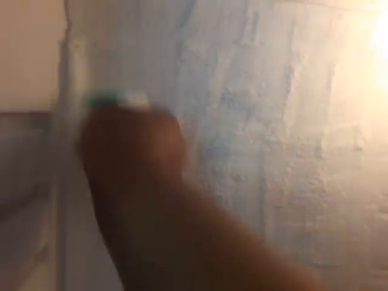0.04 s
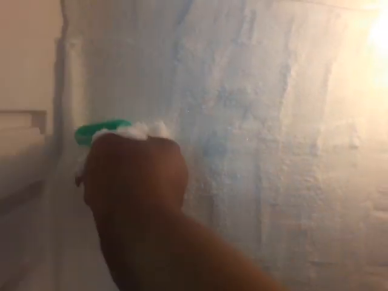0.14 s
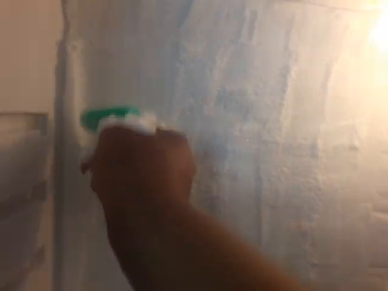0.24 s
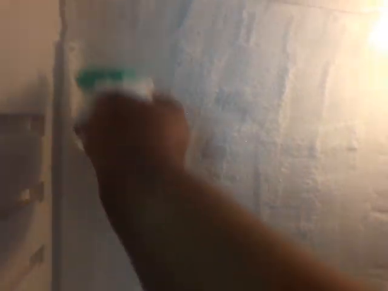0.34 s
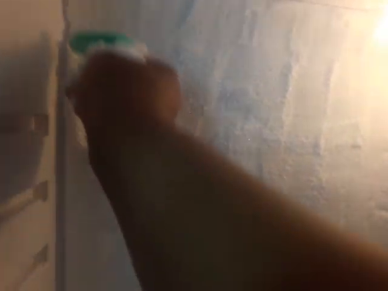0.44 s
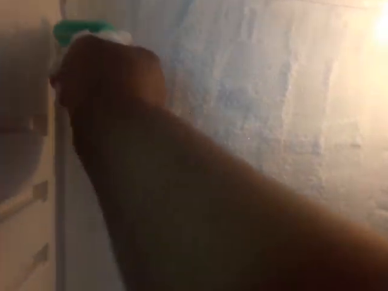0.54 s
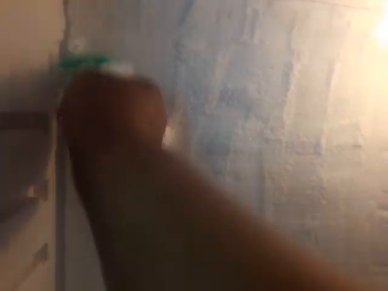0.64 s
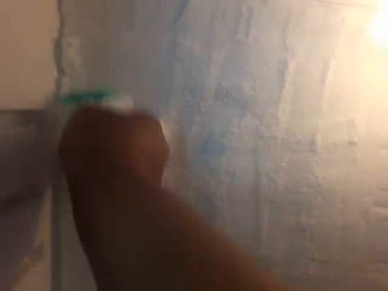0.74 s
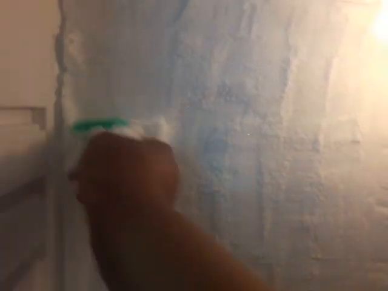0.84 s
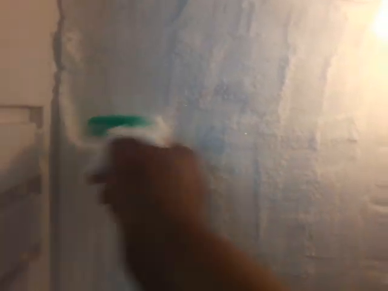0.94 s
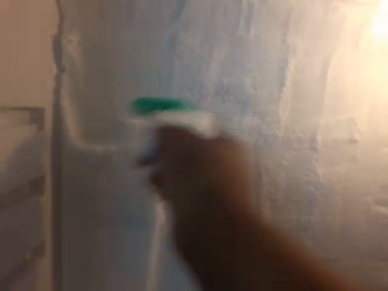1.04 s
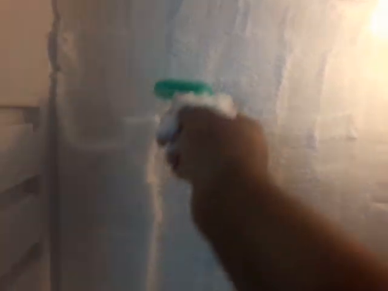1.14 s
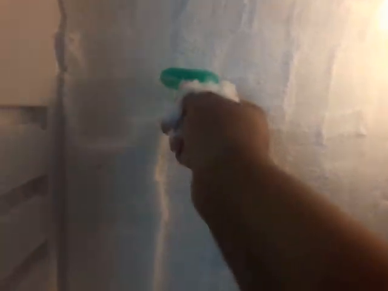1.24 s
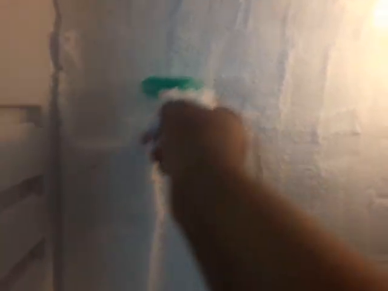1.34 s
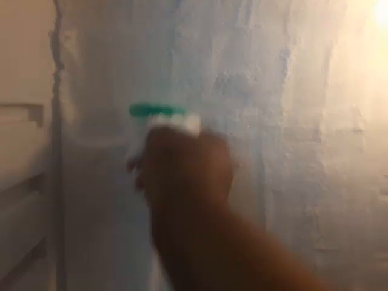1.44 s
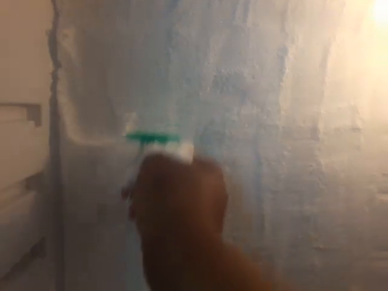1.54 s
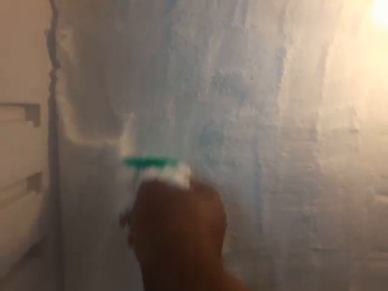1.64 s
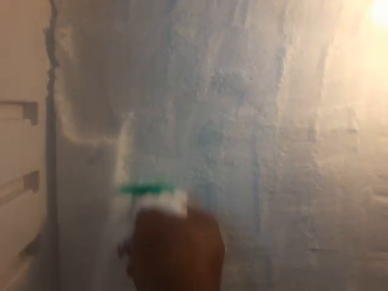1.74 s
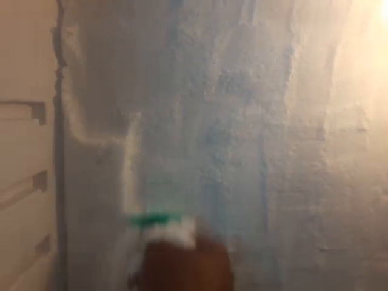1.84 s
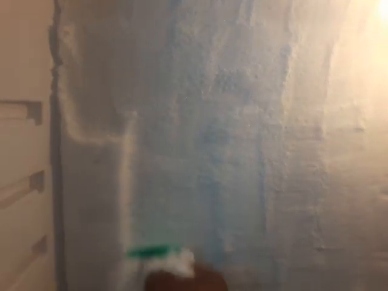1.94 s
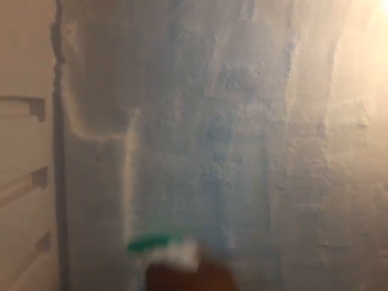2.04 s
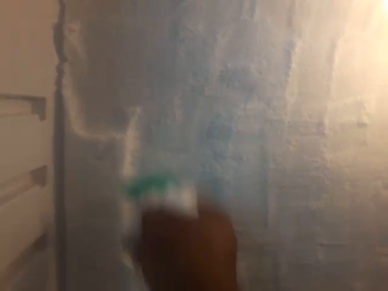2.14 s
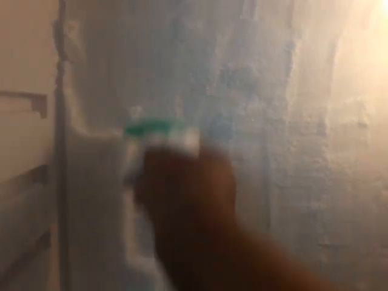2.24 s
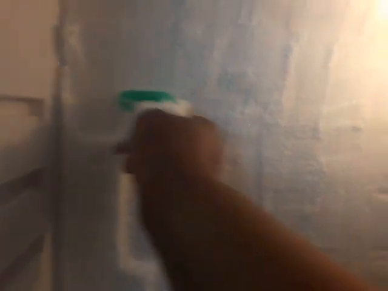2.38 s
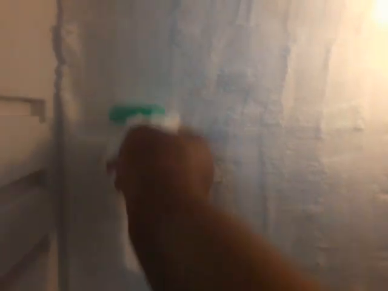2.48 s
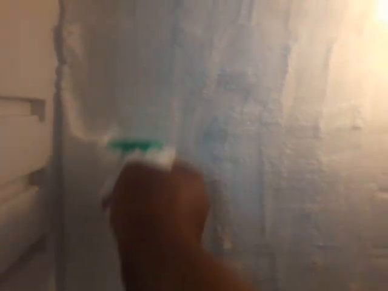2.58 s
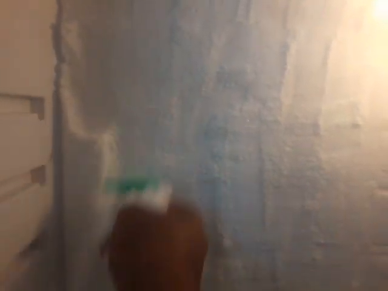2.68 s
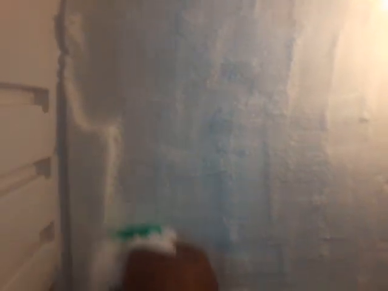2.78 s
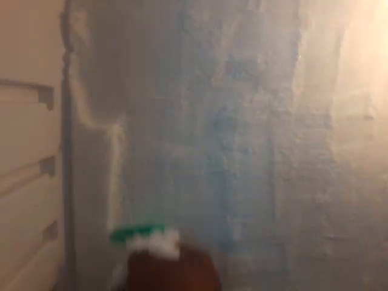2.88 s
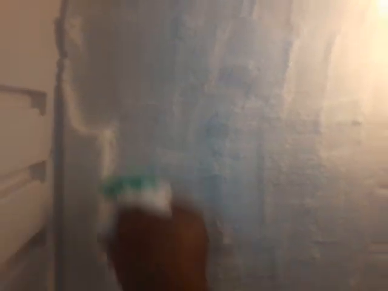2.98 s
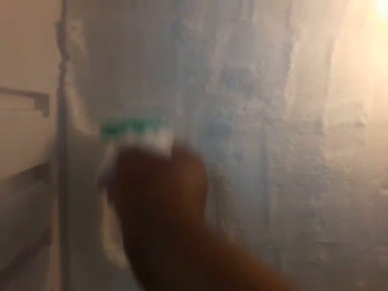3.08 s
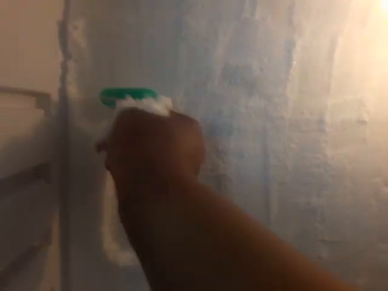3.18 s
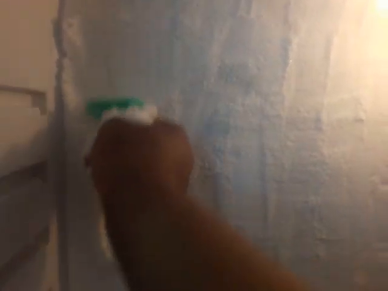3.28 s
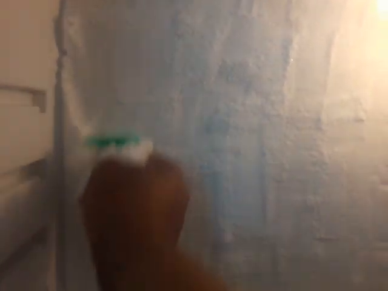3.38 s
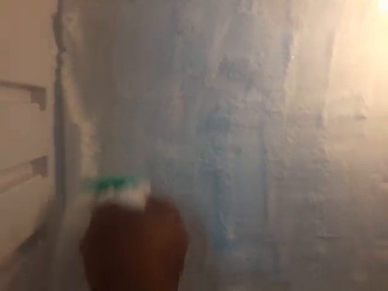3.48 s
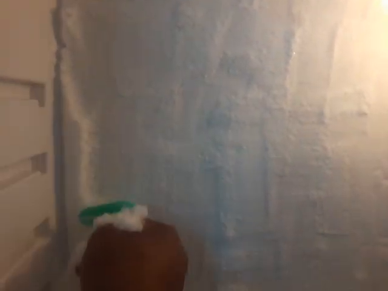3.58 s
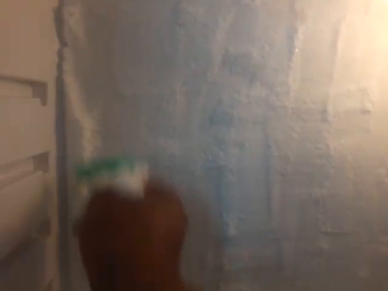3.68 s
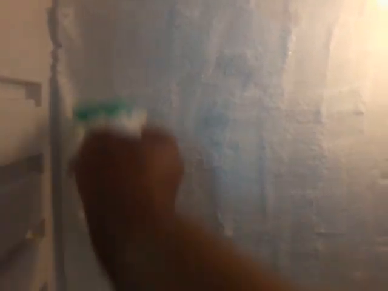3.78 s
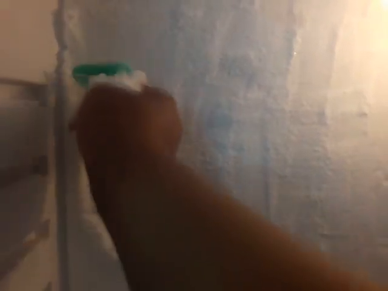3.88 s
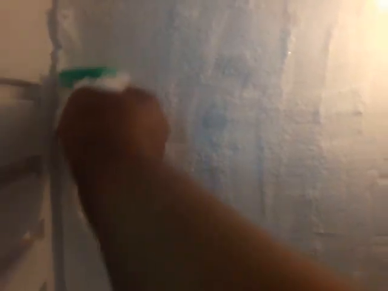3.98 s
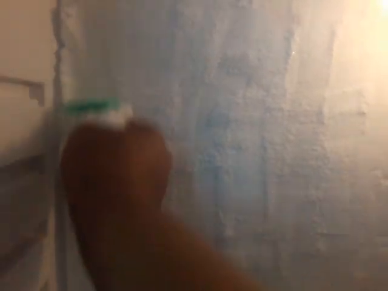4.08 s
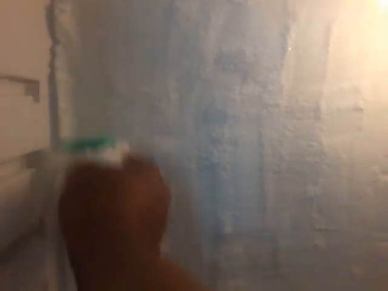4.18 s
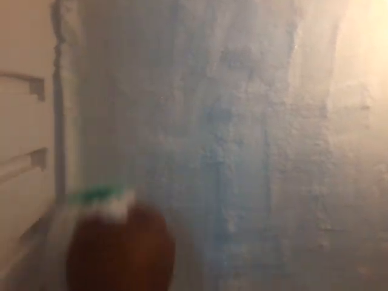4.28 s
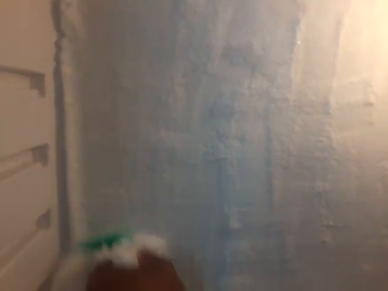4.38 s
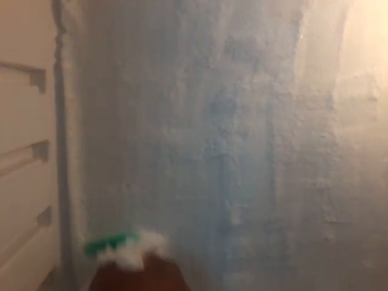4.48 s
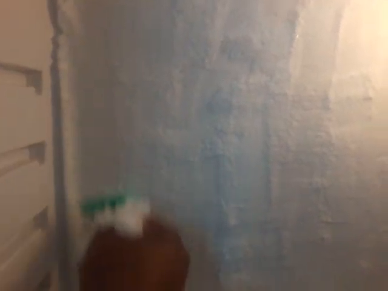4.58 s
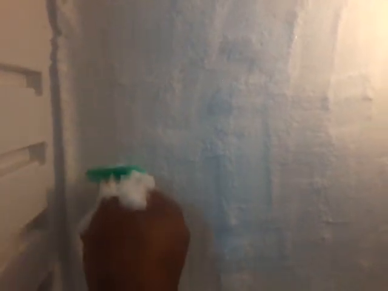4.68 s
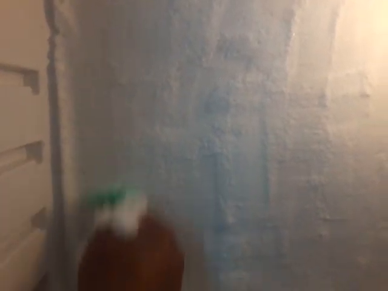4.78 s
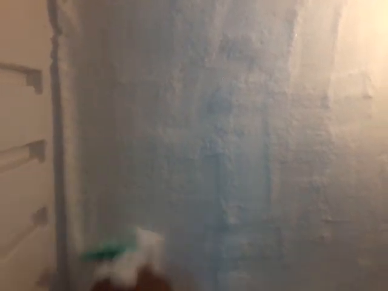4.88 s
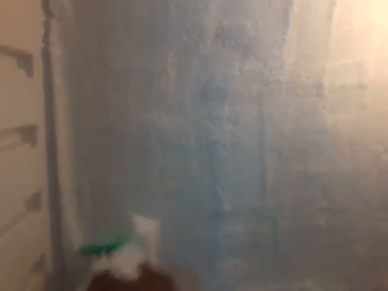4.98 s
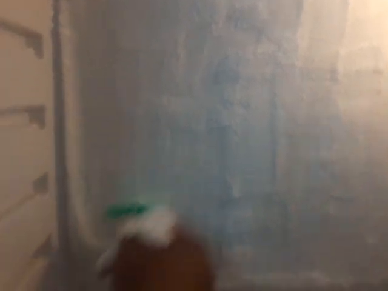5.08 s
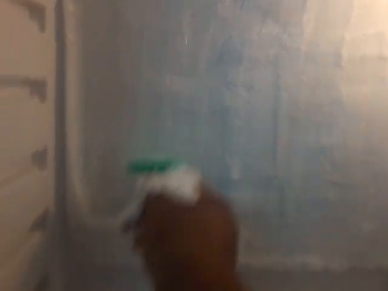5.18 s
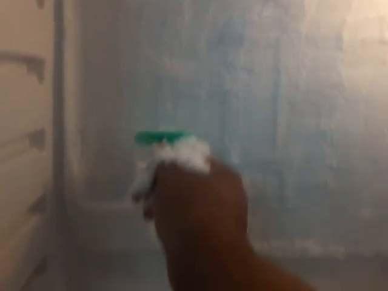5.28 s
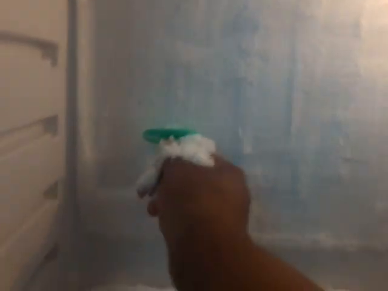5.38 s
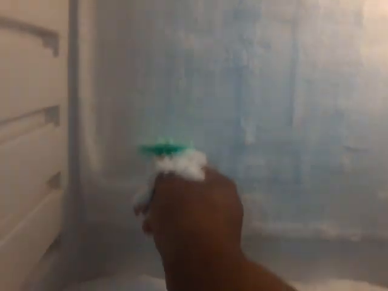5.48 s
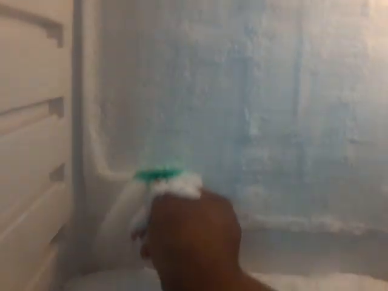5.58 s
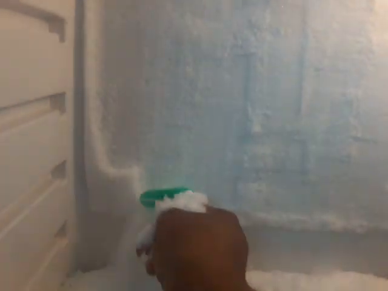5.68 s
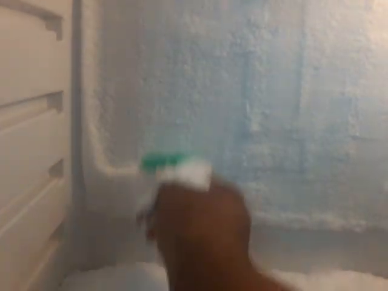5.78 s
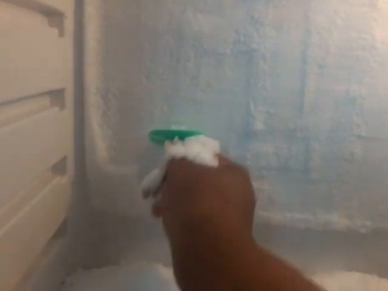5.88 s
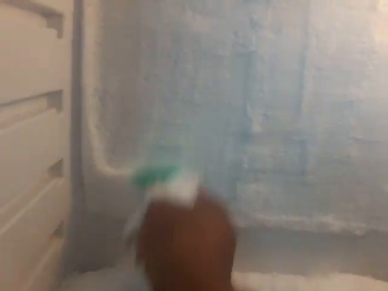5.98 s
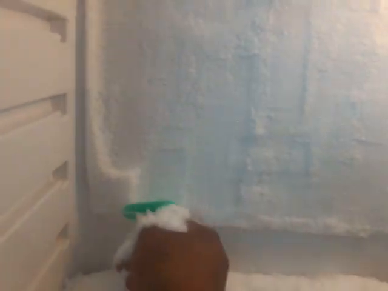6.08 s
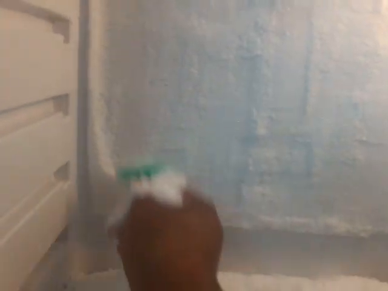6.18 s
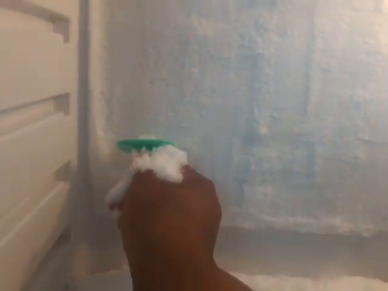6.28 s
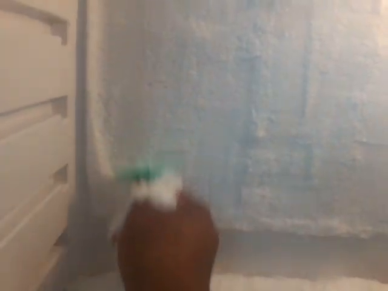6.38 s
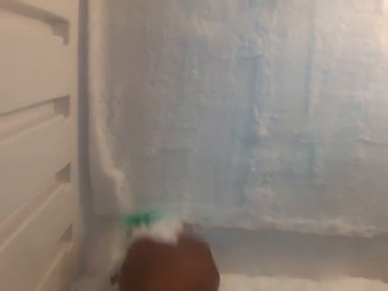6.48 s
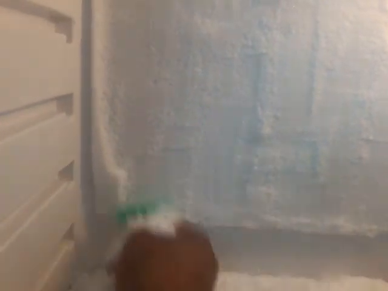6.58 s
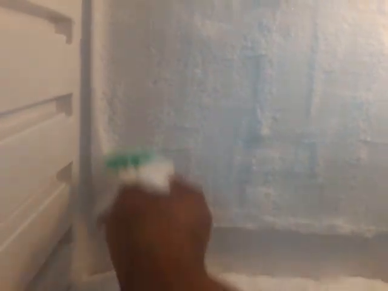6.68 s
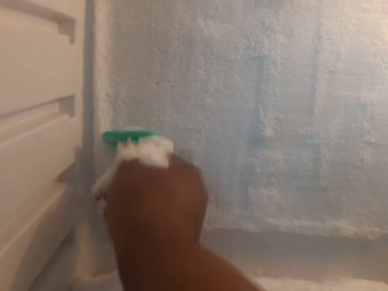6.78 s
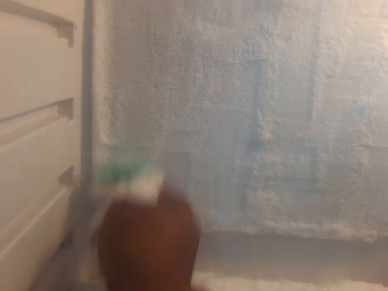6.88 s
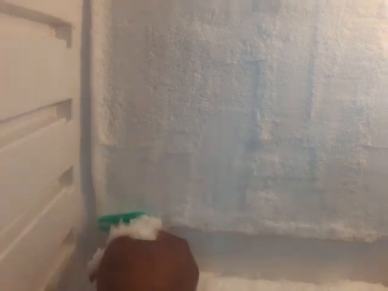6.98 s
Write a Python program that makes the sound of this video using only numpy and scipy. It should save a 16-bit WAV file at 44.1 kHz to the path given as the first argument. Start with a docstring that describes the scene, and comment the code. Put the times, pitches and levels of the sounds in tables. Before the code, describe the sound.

Gritty, crunching strokes of a plastic scraper on a frosted freezer wall, with short pauses, trickling ice bits and a low hum.

```python
"""Scraping frost from a freezer

A small plastic scraper is pulled down the frosted wall in eleven rasping strokes. The blade lands with
a crunch, then breaks a dense stream of ice crystals whose impulses excite the modes of the blade and
the hollow wall. Crumbs trickle down after the strokes; the kitchen rings faintly over a motor's hum."""
import sys
import numpy as np
from scipy import signal
from scipy.fft import rfft, irfft, next_fast_len
from scipy.io import wavfile
from scipy.ndimage import uniform_filter1d, map_coordinates

SR = 44100
rng = np.random.default_rng(int(sys.argv[2]) if len(sys.argv) > 2 else 0)


def put_to_file(sound):
    """Save the sound as 16-bit audio at rate SR, in the file named by the first command-line argument."""
    columns = np.atleast_2d(sound).T  # one column per channel
    safe = np.clip(columns, -1, 1)
    whole_steps = np.round(safe * 32767)
    wavfile.write(sys.argv[1], SR, whole_steps.astype(np.int16))


N = 310023
TIME = np.arange(N) / SR


def amp(db):
    """Amplitude ratio of a level in decibels."""
    return 10 ** (np.asarray(db) / 20)


def unit(x):
    """Normalisation to an rms of 1."""
    return x / np.sqrt(np.mean(x ** 2) + 1e-20)


def along(points, hz):
    """Interpolation of (frequency_hz, value) points on a logarithmic frequency axis."""
    point_hz, values = np.transpose(points)
    return np.interp(np.log(hz + 1), np.log(point_hz + 1), values)


def wobble(rate_hz):
    """Smooth random modulation: a spline through Gaussian knots."""
    knots = rng.standard_normal(int(N * rate_hz / SR) + 4)
    steps = np.arange(0, len(knots), 1 / 8)
    return np.interp(TIME * rate_hz, steps, map_coordinates(knots, [steps]))


def filtered(x, response):
    """Linear filtering: the spectrum is multiplied by a frequency response."""
    size = 2 * next_fast_len(N // 2 + SR // 8)
    return irfft(rfft(x, size) * response(np.fft.rfftfreq(size, 1 / SR)), size)[:N]


def coloured(x, spectrum, size=4096):
    """Minimum-phase filtering: folding the cepstrum gives a causal filter with this spectrum."""
    gain = amp(along(spectrum, np.fft.rfftfreq(size, 1 / SR)))
    cepstrum = irfft(np.log(gain))
    cepstrum[1:size // 2] *= 2
    cepstrum[size // 2 + 1:] = 0
    return signal.oaconvolve(x, irfft(np.exp(rfft(cepstrum))))[:N]


def resonance(x, hz, width_hz, gain_db=0):
    """Forced response of one damped mode."""
    return amp(gain_db) * signal.lfilter(*signal.iirpeak(hz, hz / width_hz, SR), x)


# Spectrum of the room's air: frequency_hz, relative_density_db
AIR_SPECTRUM = [(20, -33), (45, -13.5), (80, -2.5), (150, -2.5), (215, -7.5), (260, -11.5), (350, -13),
                (480, -18), (740, -20.5), (860, -26), (2200, -28.5), (3500, -36.5), (8000, -49),
                (16000, -42.5)]
def room_air():
    """Stationary broadband noise, strongest in the bass."""
    return amp(-50) * unit(coloured(rng.standard_normal(N), AIR_SPECTRUM))


# Partials of the motor: frequency_hz, level_db
MOTOR_PARTIALS = [(96.9, -69), (145.3, -52.5), (193.8, -53), (274.5, -71.5), (737.5, -68.5)]
def motor_hum():
    """A line spectrum whose partials wander slowly in phase."""
    return sum(amp(db) * np.sqrt(2) * np.sin(2 * np.pi * hz * TIME + 0.49 * wobble(2.1))
               for hz, db in MOTOR_PARTIALS)


# Swells of a thin high hiss: centre_s, level_db
HISS_SWELLS = [(1.29, -74), (3.19, -64.5), (5.16, -66), (6.82, -59)]
def thin_hiss(centre_hz=4330, width_hz=210, swell_s=.12):
    """Narrow-band noise comes and goes under Gaussian envelopes."""
    band = filtered(rng.standard_normal(N), lambda f: np.exp(-((f - centre_hz) / width_hz) ** 2 / 2))
    swells = sum(amp(db) * np.exp(-((TIME - s) / swell_s) ** 2 / 2) for s, db in HISS_SWELLS)
    return unit(band) * swells


# Reverberation time of the kitchen: frequency_hz, t60_s
KITCHEN_DECAY = [(150, 0.51), (600, 0.69), (2500, 0.52), (8000, 0.31), (15000, 0.35)]
def kitchen(x, paths=5, path_s=.06):
    """Reverberation: each frequency decays at its own rate, along new paths as the arm moves."""
    hz, t, noise = signal.stft(rng.standard_normal((paths, SR)), SR, nperseg=256)
    decay = amp(-60 * t / along(KITCHEN_DECAY, hz)[:, None])
    tails = signal.istft(noise * decay, SR, nperseg=256)[1]
    path = (TIME / path_s).astype(int) % paths
    return sum(signal.fftconvolve(x * (path == k), tail / np.linalg.norm(tail))[:N]
               for k, tail in enumerate(tails))


def compartment(x, reflection=0.28, sway_s=0.0002, delays_s=(.0009, .0017, .0029, .0046)):
    """Early reflections from the near walls; their delays slide as the hand moves."""
    echoes = sum(map_coordinates(x, [np.arange(N) - SR * (delay + sway_s * wobble(3))], order=3)
                 for delay in delays_s)
    return (x + reflection * echoes) / np.sqrt(1 + len(delays_s) * reflection ** 2)


def fractures(rate_hz, spread_db):
    """Brittle fracture as a Poisson train of impulses with log-normal sizes."""
    snaps = (rng.random(N) < rate_hz / SR) * rng.choice([-1, 1], N)
    return unit(snaps * amp(spread_db * rng.standard_normal(N)))


# Spectrum of breaking ice crystals: frequency_hz, relative_density_db
ICE_SPECTRUM = [(40, -34.5), (150, -22.5), (600, -14), (850, 0.5), (1100, -1), (1700, 0), (2800, -3),
                (4800, -9), (6000, -3), (7400, -2.5), (8000, -10.5), (9000, -4.5), (10800, -12.5),
                (12500, -10), (16000, -15)]
def crackle(force):
    """Source and filter: a broadband force takes on the spectrum of breaking ice."""
    return unit(coloured(force, ICE_SPECTRUM))


def falling_powder(fade_s=0.1):
    """Shot noise of tiny impacts, decaying exponentially after each lift of the blade."""
    spill = sum(amp(db) * (TIME > lift) * np.exp(-np.abs(TIME - lift) / fade_s)
                for _, lift, *_, db in PULLS)
    return spill * crackle(fractures(rate_hz=1100, spread_db=3.5) * amp(3.5 * wobble(90)))


# Chips of ice hitting the cabinet: start_s, relative_level_db, ring_hz
CHIP_IMPACTS = [(0.2683, -26, 1960), (0.3207, -33, 1960), (0.345, -30.5, 2420), (0.375, -32.5, 2000),
                (0.4186, -37, 2000), (0.4727, -37.5, 2000), (1.0635, -35.5, 1970), (1.0859, -33.5, 1980),
                (3.1793, -26.5, 6900), (3.2325, -44.5, 2140), (3.768, -27.5, 3090), (3.787, -32, 1950),
                (3.823, -33.5, 2160), (4.72, -40.5, 3100), (6.2017, -26.5, 5150), (6.761, -27, 6000),
                (6.802, -39.5, 2370)]
def falling_chips(attack_s=0.00048, decay_s=0.0066, ring_db=-4):
    """Impact transients: each chip shatters in a noise burst and rings briefly."""
    sound, t = np.zeros(N), np.arange(SR // 10) / SR
    shatter = crackle(rng.standard_normal(N))
    burst = (1 - np.exp(-t / attack_s)) * np.exp(-t / decay_s)
    for start, db, hz in CHIP_IMPACTS:
        span = round(start * SR) + np.arange(len(t))
        ring = unit(resonance(shatter[span], hz, width_hz=350))
        sound[span] += amp(db - 11.5) * burst * (shatter[span] + amp(ring_db) * ring)
    return sound


def wall(force, strength, modes, pitch_hz, focus, roam_db, low_hz, high_hz):
    """Modal coupling: the contact favours modes near its pitch; each swells and sinks across nodes."""
    shake = np.zeros(N)
    for hz, width_hz, db in modes:
        detuning = np.log(hz / pitch_hz) / focus
        shake += resonance(force, hz, width_hz, db) * amp(roam_db * wobble(4.1)) / np.hypot(1, detuning)
    shake = unit(filtered(shake, lambda f: 1 / np.sqrt(1 + (f / high_hz) ** 12)))
    # the modes trade strength while their sum stays nearly even
    shake /= np.sqrt(np.abs(uniform_filter1d(shake ** 2, size=2600)) + 0.17)
    # the wall radiates almost nothing below these modes
    return signal.sosfilt(signal.butter(8, low_hz, "high", fs=SR, output="sos"), shake * strength)


# Modes of the hollow wall bending as a whole: frequency_hz, width_hz, relative_gain_db
BENDING_MODES = [(144, 4.4, -20), (152.1, 10.8, 5.5), (202, 9.8, -6.5), (217.7, 4.7, 3.5)]
def wall_boom(force, strength, sag_hz=17):
    """Low bending resonances: the favoured pitch sinks ever faster towards the bottom."""
    pitch_hz = held([boom_hz for *_, boom_hz, _ in PULLS]) - sag_hz * descent() ** 2
    return amp(-2.5) * wall(force, strength, BENDING_MODES, pitch_hz,
                            focus=0.047, roam_db=2, low_hz=130.5, high_hz=222)


# Higher modes of the wall's liner: frequency_hz, width_hz, relative_gain_db
LINER_MODES = [(331.5, 9.8, 6.5), (372.6, 16.7, 2), (441.5, 43, 2.5), (489, 10, 3.5), (538, 26, 5.5),
               (568.2, 12.4, 4), (673, 190, -10)]
def liner_rattle(force, strength, rise_hz=30):
    """Higher plate resonances: the favoured pitch climbs as the blade travels down."""
    pitch_hz = held([rattle_hz for *_, rattle_hz, _, _ in PULLS]) + rise_hz * (descent() - .5)
    return amp(-1) * wall(force, strength, LINER_MODES, pitch_hz,
                          focus=0.17, roam_db=4, low_hz=217, high_hz=764)


# Modes of the patch of wall under the blade, one list a stroke: frequency_hz, level_re_rasp_db
PATCH_MODES = [
    [(335, -8.5), (990, -15.5), (1400, -11)],
    [(335, -8.5), (1230, -9), (2040, -14.5), (6600, -10)],
    [(1735, -15)],
    [(5600, -15)],
    [(1000, -18.5), (1240, -14.5)],
    [(2450, -14)],
    [(2170, -8), (2550, -15), (4100, -16)],
    [(880, -11)],
    [(945, -10), (6550, -9)],
    [(932, -7), (9300, -13)],
    [(930, -10.5), (1830, -12), (2880, -12), (9150, -17)],
]
def wall_patches(force, quality=14):
    """Local resonances sound only while the blade is on their patch of wall."""
    sound, drift = np.zeros(N), amp(2.5 * wobble(9))
    for (start, lift, *_), modes in zip(PULLS, PATCH_MODES):
        contact = (TIME >= start - .02) & (TIME < lift + .03)
        for hz, db in modes:
            sound[contact] += amp(db) * unit(resonance(force[contact], hz, hz / quality) * drift[contact])
    return sound


# Modes of the plastic blade: frequency_hz, width_hz, relative_gain_db
BLADE_MODES = [(1189, 15, 10), (1470, 130, -4), (2200, 270, -4), (2517, 210, 1.5), (3080, 310, -3),
               (4120, 1200, -2.5), (5370, 550, -4.5), (6550, 240, -15), (7410, 160, -11), (8470, 220, -0.5),
               (8970, 84, -13)]
def blade(force, ring_db=-8, grip_db=3):
    """Direct crackle plus forced vibration of the blade, whose modes vary in strength with the grip."""
    ring = sum(resonance(force, *mode) * amp(grip_db * wobble(7)) for mode in BLADE_MODES)
    return unit(crackle(force) + amp(ring_db) * unit(ring))


# Ridges under the blade: centre_s, rattle_drive_db, boom_drive_db
RIDGES = [(.135, -18.5, -25), (.865, -13.5, -27), (1.44, -18, -29), (1.48, -15, -19), (1.715, -19.5, -12),
          (1.79, -40, -15.5), (2.01, -28, -19), (2.605, -25, -16.5), (2.675, -20, -27.5),
          (3.475, -29.5, -16.5), (3.655, -29, -21), (4.115, -17, -18.5), (4.845, -52, -18),
          (5.515, -27, -18.5), (6.015, -70, -20), (6.578, -22.5, -11.5), (6.635, -38, -33)]
def jolts(half_length_s=.017):
    """Each ridge shoves the wall: a Gaussian pulse of power into rattle and boom."""
    return sum(np.outer(amp(wall_db) ** 2, np.exp(-((TIME - centre) / half_length_s) ** 2))
               for centre, *wall_db in RIDGES)


# The blade lands or breaks off a lump: start_s, length_s, rasp_drive_db, wall_re_rasp_db
LUMPS = [(0.662, 0.026, -36, -3), (.695, .008, -26.5, -6), (1.363, 0.012, -29.5, 0),
         (1.394, .008, -29, 4.5), (1.922, .014, -19, -6), (2.442, .022, -24.5, -4), (2.806, .016, -16, -8),
         (3.182, .008, -50, 8), (3.287, .021, -23, -5), (3.590, .016, -14, -7), (3.618, .021, -15, -7),
         (4.008, 0.019, -26, -1.5), (5.954, 0.02, -27, -2), (6.852, .01, -36, -12),
         (6.862, .022, -23, -4.5)]
def bites(release_s=.007):
    """Loading and release: power into rasp, rattle and boom rises fast and decays once a lump gives."""
    power, t = np.zeros((3, N)), np.arange(SR // 10) / SR
    for start, length, db, wall_db in LUMPS:
        crush = np.minimum(t / (.3 * length), 1) * np.exp(-np.maximum(t - length, 0) / release_s)
        span = round(start * SR) + np.arange(len(t))
        power[:, span] += np.outer(amp([db, db + wall_db, db + wall_db]), crush) ** 2
    return power


# Pulls of the scraper: start_s, lift_s, rest_s, speed_up_s, slow_down_s, slowing_loss_db, rasp_drive_db,
# rattle_re_rasp_db, boom_re_rasp_db, rattle_pitch_hz, boom_pitch_hz, powder_db
PULLS = [(-.15, .25, 0, .08, .145, 17.5, -19, -0.5, -5.5, 525, 214, -42),
         (.696, .979, 0.0093, 0.072, 0.087, 16, -19.5, 0, -2.5, 535, 207.5, -48.5),
         (1.38, 2.108, 0.026, 0.12, 0.094, 19.5, -20.5, 0, 1, 438, 205.5, -60),
         (2.46, 2.926, 0.044, 0.083, 0.1, 12.5, -19.5, -1.5, 0, 495, 204, -54),
         (3.3, 3.653, 0.025, 0.045, 0.073, 9.5, -19.5, -1, -1, 473, 204, -44),
         (4.02, 4.543, 0.021, 0.1, 0.1, 18, -18.5, -2, -2.5, 480, 214, -54),
         (4.811, 5.064, 0.0088, 0.09, 0.11, 21, -18.5, -1.5, -3, 520, 202.4, -55.5),
         (5.486, 5.762, 0.00084, 0.11, 0.14, 12, -18.7, -1, -1, 519, 209, -66),
         (5.96, 6.135, 0.032, 0.049, 0.076, 5.5, -19.5, 0, 3, 478, 216.7, -62),
         (6.398, 6.599, 0, 0.094, 0.094, 7, -19, 0.5, 0.5, 500, 204, -75),
         (6.87, 7.2, 0.028, 0.06, .1, 17, -18.5, -2, -1.5, 500, 211, -55)]
def stroke_envelopes(touch_s=.008, resting_loss_db=15):
    """Rasp, rattle and boom follow the blade's speed; strokes, bites and jolts add in power."""
    power, depth = bites(), descent() - .5
    for start, lift, rest, rise, fall, slow_db, rasp_db, rattle_db, boom_db, *_ in PULLS:
        span = np.flatnonzero((TIME > start - .02) & (TIME < lift + .2))
        t = TIME[span]
        touch = np.clip((t - start) / touch_s + .5, 0, 1)
        slowing = np.clip(1 - (lift - t) / fall, 0, 1) ** 2
        # offset_db, attack_s, release_s; lower down, the wall rattles less and booms more
        layers = [(0, rise, .0062),
                  (rattle_db - 5 * depth[span], .96 * rise, .016),
                  (boom_db + 3 * depth[span], .96 * rise, .021)]
        for k, (offset_db, attack_s, release_s) in enumerate(layers):
            starting = np.clip(1 - (t - start - rest) / attack_s, 0, 1) ** 2
            level = amp(rasp_db + offset_db - resting_loss_db * starting - slow_db * slowing)
            release = np.exp(-np.maximum(t - lift, 0) / release_s)
            power[k, span] += (level * touch * release) ** 2
    power[1:] += jolts()
    return np.sqrt(power)


def descent():
    """Position of the blade: 0 at the top, 1 at the bottom, returning during the pause."""
    return np.interp(TIME, [s for pull in PULLS for s in pull[:2]], [0, 1] * len(PULLS))


def held(values):
    """One value a stroke, constant from its start to its lift."""
    return np.interp(TIME, [s for pull in PULLS for s in pull[:2]], np.repeat(values, 2))


def frost_hardness(crust_db=1.5, top_db=-1.7, bottom_db=0.77, loose_db=-12, crust_s=.015, lift_s=.03):
    """Spectral tilt in dB: crisp crust, soft frost that hardens downwards, then loose frost."""
    course = []
    for start, lift, *_ in PULLS:
        course += [(start - crust_s, crust_db), (start, crust_db), (start + crust_s, top_db),
                   (lift, bottom_db), (lift + lift_s, loose_db)]
    lumps = bites()[0]
    return np.interp(TIME, *np.transpose(course)) - 2 * lumps / lumps.max()  # big lumps break duller


def scraping(crossover_hz=4200):
    """Stick-slip friction breaks crystals in clumps, driving blade and wall; hard frost is brighter."""
    rasp, rattle, boom = stroke_envelopes()
    slips = amp(1.1 * wobble(420) + .8 * wobble(110) + .5 * wobble(30))
    force = fractures(rate_hz=7000, spread_db=3) * slips
    crunch = compartment(blade(force))
    crunch += wall_patches(fractures(rate_hz=7000, spread_db=4) * slips)
    lows = filtered(crunch, lambda f: 1 / (1 + (f / crossover_hz) ** 4))
    tilt = amp(frost_hardness())
    crunch = lows / tilt + (crunch - lows) * tilt
    return amp(-1.07) * rasp * crunch + liner_rattle(force, rattle) + wall_boom(force, boom)


def scene():
    """Superposition of the direct sound, its reverberation and the background."""
    direct = scraping() + falling_powder() + falling_chips()
    return (direct + amp(-19) * kitchen(direct) + room_air() + motor_hum() + thin_hiss())[None]


def record(dry, ceiling=.78, top_hz=15900):
    """Soft saturation rounds the highest peaks; a steep low-pass limits the band."""
    rounded = dry[0] / (1 + np.abs(dry[0] / ceiling) ** 6) ** (1 / 6)
    return filtered(rounded, lambda hz: np.clip((top_hz - hz) / 400 + .5, 0, 1) ** 2)[None]


dry = scene()
out = record(dry)
put_to_file(out)
```